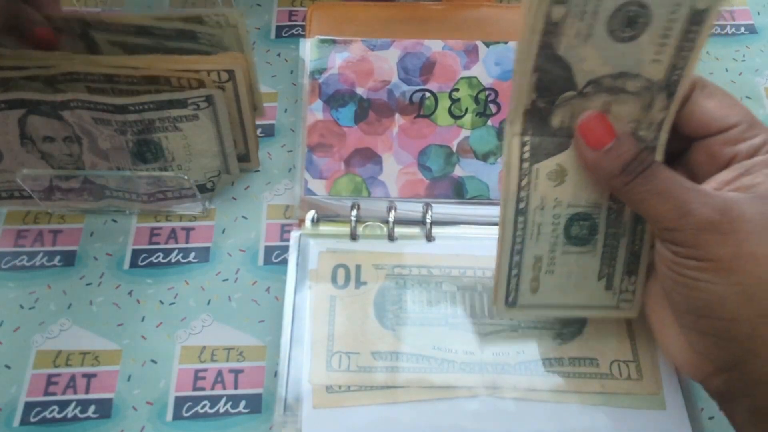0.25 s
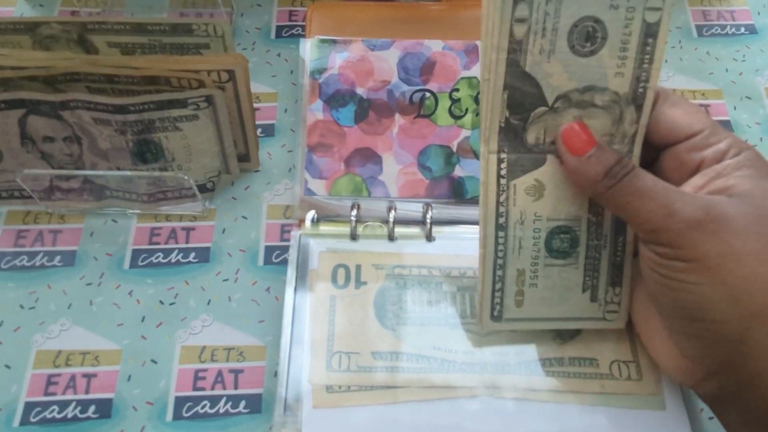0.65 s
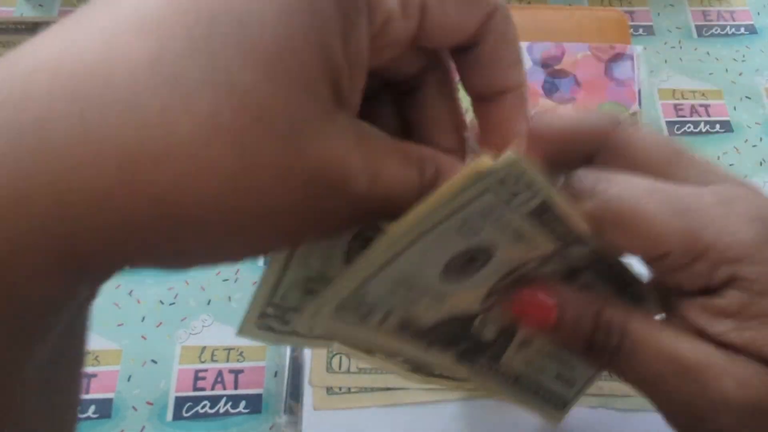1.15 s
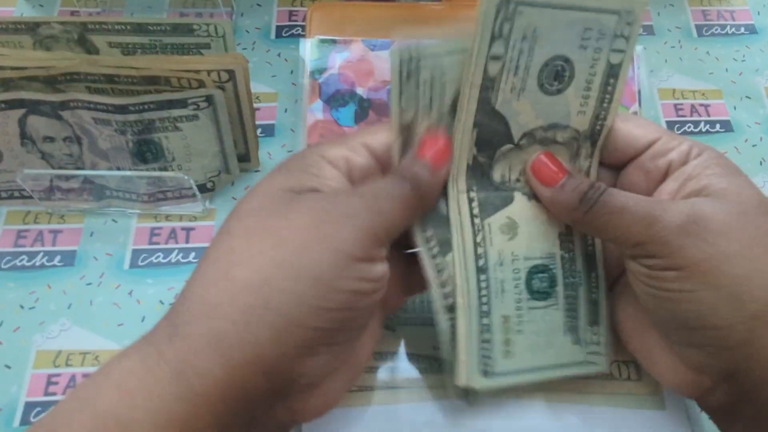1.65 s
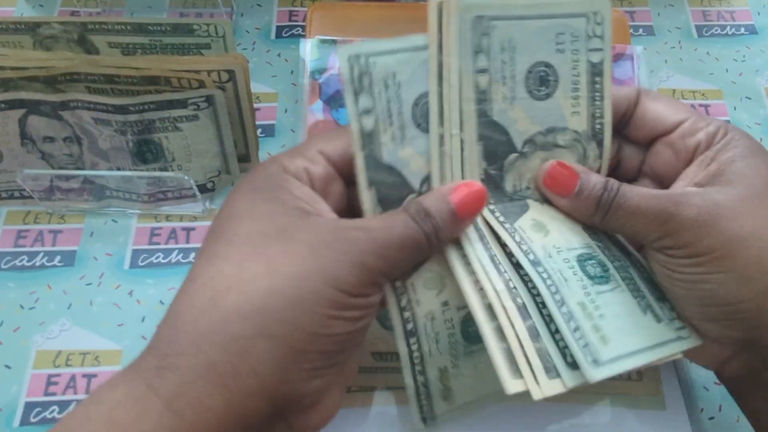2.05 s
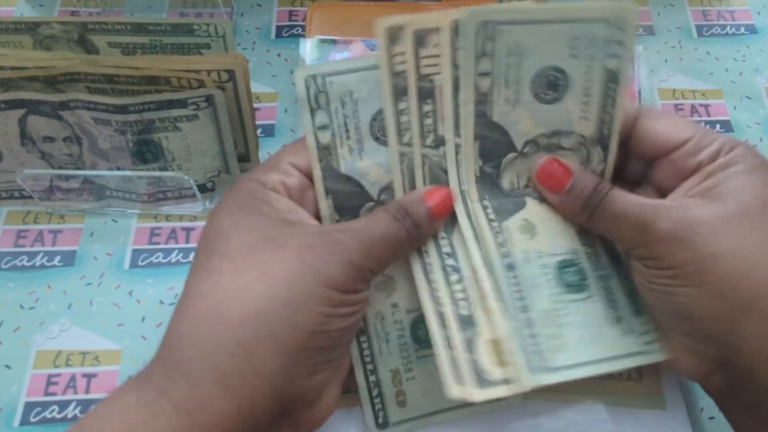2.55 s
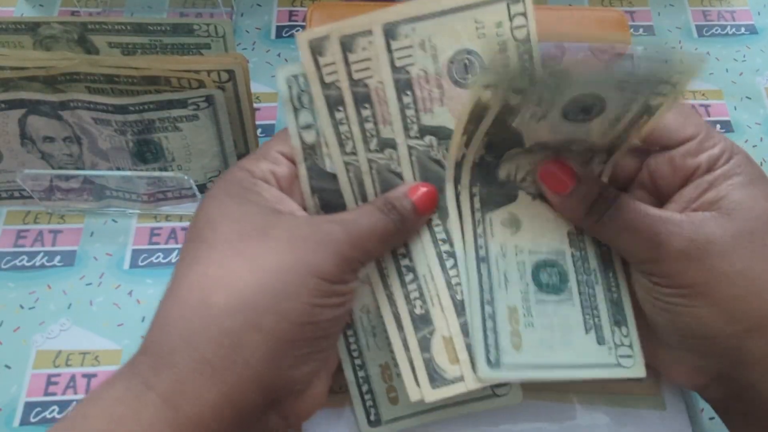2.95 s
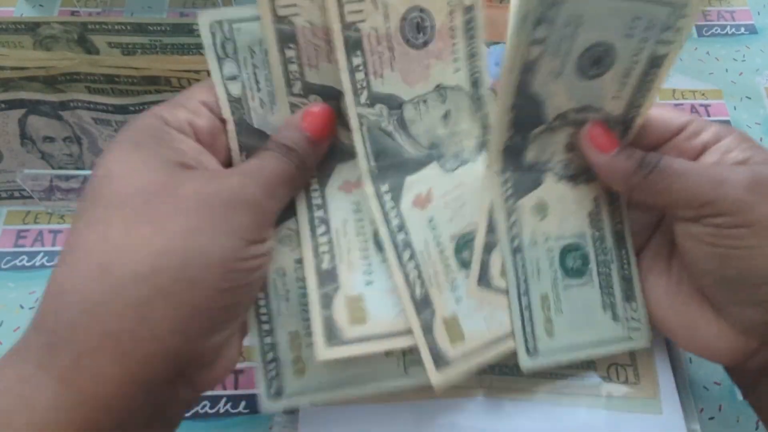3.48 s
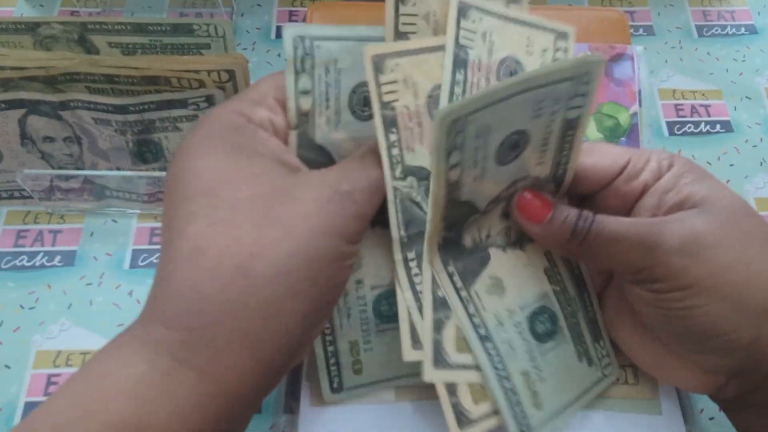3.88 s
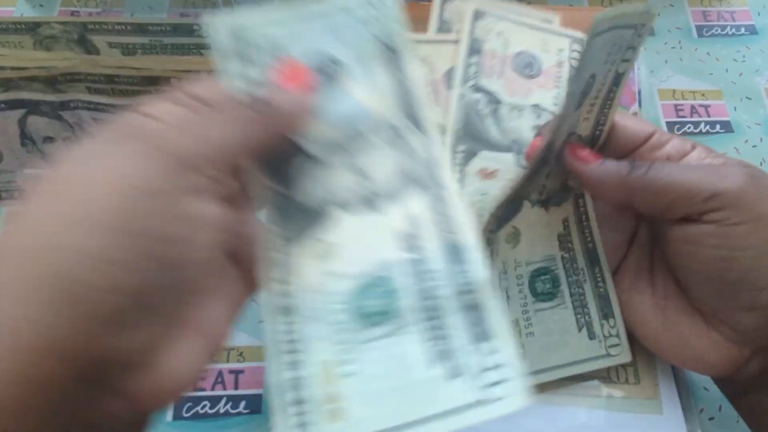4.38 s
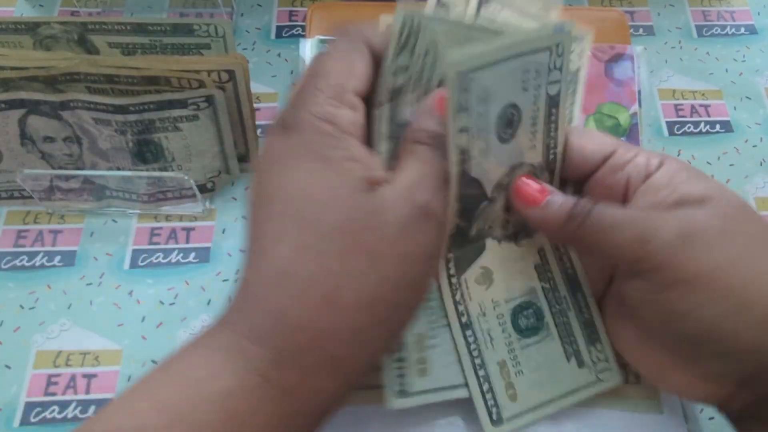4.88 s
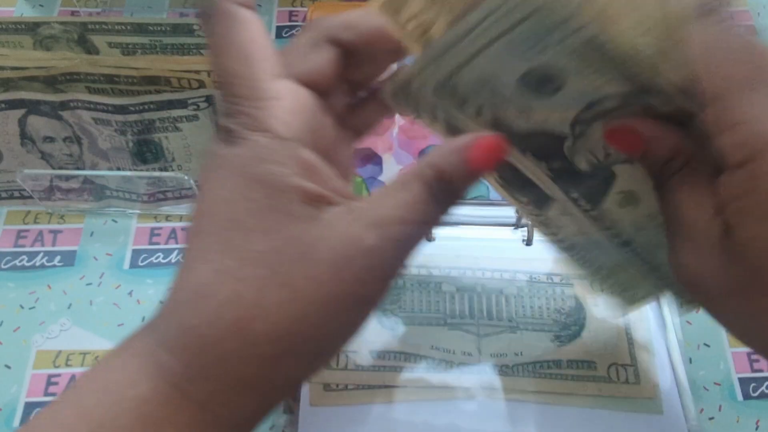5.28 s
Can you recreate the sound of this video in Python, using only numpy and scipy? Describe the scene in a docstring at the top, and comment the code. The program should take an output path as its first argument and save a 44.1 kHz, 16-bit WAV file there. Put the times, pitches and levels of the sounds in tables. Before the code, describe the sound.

A stack of paper money is fanned and leafed through by hand, faint papery slides and crackling pops in a quiet room.

```python
"""A faint grainy rustle opens: paper banknotes gathered, fanned and leafed through by hand, close above a desk.
Notes slide in short strokes (bursty filtered noise), crinkle (short rings), and scrape at their edges.
Bent notes buckle with snaps (pulse and noise through a resonance), and one is flicked off the stack.
Pushed air puffs low (low-band noise); the desk colours the snaps, a quiet room answers over its tone."""
import sys
import numpy as np
from scipy import signal
from scipy.fft import rfft, irfft, next_fast_len
from scipy.io import wavfile
from scipy.ndimage import uniform_filter1d, map_coordinates

SR = 44100
rng = np.random.default_rng(int(sys.argv[2]) if len(sys.argv) > 2 else 0)


def log_audio(samples):
    """Write samples as a 16-bit WAV file to the path given in sys.argv[1]."""
    # one column per channel
    frames = np.atleast_2d(samples).T
    # limit to full scale, then quantise
    limited = np.clip(frames, -1, 1)
    pcm = np.round(limited * 32767).astype(np.int16)
    wavfile.write(sys.argv[1], SR, pcm)


N = 243917

# All table levels are relative; the mix trims them further.
# room tone spectrum: freq_hz, level_db
ROOM_TONE_COLOUR = [(20, -46.5), (32, -22), (50, -3.5), (110, -1), (200, -10.5), (300, -8), (430, -5.5),
                    (640, -15), (950, -15.5), (1600, -36), (4000, -28), (15000, -43)]
# room decay: freq_hz, t60_s
ROOM_DECAY = [(150, 0.16), (1200, 0.26), (5000, 0.49), (14000, 0.42)]
# left-right likeness: freq_hz, correlation (0..1)
STEREO_LIKENESS = [(100, 0.86), (500, 0.81), (1200, 0.63), (2000, 0.24), (3200, 0.069), (6000, 0.094),
                   (15000, .03)]
# where the hands hold the notes: time_s, right_lag_ms, left_minus_right_db
HAND_POSITIONS = [(0,0.29,0), (.75,0.28,0.5), (1.3,0.14,0), (1.6,0.0076,-2), (2.5,0.056,-1), (3.2,.02,-1),
                  (3.7,0.096,-0.5), (4.2,0.13,0), (4.7,0.049,0), (5.1,0.025,-1.5), (5.5,-0.034,0.5)]
# fingertip drags, one fold sings: middle_s, half_length_s, centre_hz, width_hz, level_db
DRAGS = [(0.135, 0.047, 3600, 910, -67), (0.38, 0.033, 3080, 1600, -57.5), (0.457, .025, 3330, 1100, -62),
         (0.499, 0.021, 2270, 400, -60), (0.576, .05, 2940, 1300, -60), (0.776, 0.02, 2720, 800, -59),
         (0.955, 0.03, 2220, 800, -57.5), (2.079, 0.019, 2280, 500, -66.5), (2.232, 0.039, 1070, 300, -60),
         (4.369, 0.021, 3800, 1600, -56), (4.692, 0.0057, 3470, 1110, -42), (4.721, 0.02, 2580, 890, -40)]
# edge swipes across a note: start_s, length_s, level_db, body_re_hiss_db
SWIPES = [(0.224, 0.015, -55, -8.5), (0.606, .015, -53, -6), (0.721, 0.046, -52, -20),
          (0.981, 0.04, -50, -11), (1.118, 0.013, -53, -9), (1.214, 0.0037, -55, -5),
          (1.487, 0.037, -47.5, -3.5), (1.933, .025, -53, -1.5), (2.266, .01, -55, -11),
          (2.448, 0.026, -52, -8), (3.668, 0.012, -46.5, -8), (3.705, 0.0032, -39.5, 0),
          (3.726, 0.027, -61, -4), (4.689, 0.009, -41.5, -2.5), (4.707, 0.037, -37.5, -12)]
# swipe hiss spectrum: freq_hz, level_db
SWIPE_HISS_COLOUR = [(1200, -30.5), (2400, -2.5), (3500, -3.5), (6000, -1), (10000, -5), (15000, -5.5)]
# buckling notes: time_s, body_db, pitch_hz, sharpness_q, crack_db, air_push_db, left_minus_right_db
SNAPS = [(.067,-54.5,1570,0.37,-67,-77,-2), (0.1219,-54.5,2170,1.6,-64.5,-74,0.5),
         (.322,-54.5,1400,2.6,-74,-75,1), (.6533,-54,1300,1.6,-65,-71,-3),
         (0.6908,-45.5,1390,1.5,-72,-52.5,1), (.7443,-39,2190,0.87,-58,-44.5,2),
         (.8008,-52.5,814,1.3,-80,-59,1), (0.8845,-35,1710,1,-73,-52,-2.5),
         (0.9107,-41.5,1070,4.5,-66,-68,2.5), (0.9139,-37.5,1320,2.3,-60,-67,-3.5),
         (1.005,-40,1490,1.5,-46.5,-48,-2), (1.0189,-41.5,1350,5.7,-69,-46.5,-1),
         (1.113,-54.5,1660,1.3,-66,-75,-2), (1.2031,-56,480,2.1,-60,-59,-1),
         (1.25,-39.5,1630,.97,-48.5,-55,0), (1.2814,-44.5,535,1.4,-53,-54,0),
         (1.3245,-50,2010,1.6,-55,-54,2), (1.3564,-50,1960,1.4,-49.5,-52,-4),
         (1.3719,-45,1320,0.62,-48,-54,1), (1.4882,-60,1940,1.9,-46.5,-61,-2),
         (1.498,-45,2200,1.4,-43.5,-51,-3), (1.521,-54.5,1980,1.6,-43.5,-59,-1),
         (1.7389,-43,1380,1.04,-66,-64,-2), (1.7573,-52,1450,1.1,-69,-54,-1),
         (1.8419,-45,1340,0.71,-65,-51.5,-3), (1.941,-50.5,1280,1.8,-58,-63,-1),
         (2.2657,-58,1840,1.9,-50,-80,-3), (2.4697,-35,1230,1,-62,-49.5,-2),
         (2.5774,-50,1160,2.9,-53.5,-62,-2), (2.8206,-33,1630,2.6,-35,-80,-3.5),
         (2.9418,-47.5,1680,1.8,-53.5,-84,-2), (3.072,-62,446,1.2,-75,-60,-1),
         (3.1534,-48.5,970,1.5,-70,-51.5,-2), (3.217,-45.5,625,1,-53,-60,-1),
         (3.2617,-52,985,1.8,-68,-61,0), (3.481,-52,1400,3.1,-66,-82,-5),
         (3.6688,-47.5,880,1.2,-51,-51.5,1), (3.7049,-30,2260,0.98,-24,-46,2.5),
         (3.712,-30,1890,1.7,-39,-40,-2), (3.718,-35,1480,1.9,-48,-41,-1), (3.807,-55.5,600,1.8,-70,-65,-3),
         (3.998,-56.5,560,1.3,-70,-57,-1), (4.0256,-42,1310,3.4,-59,-61,-2),
         (4.0652,-49.5,756,4.5,-57,-70,-2), (4.2221,-46,2420,0.62,-65,-63,2),
         (4.2264,-41.5,1260,7.2,-71,-60,-5), (4.3213,-52.5,499,4.7,-57,-59,0),
         (4.471,-60.5,520,2.2,-70,-82,-1), (4.63,-64,520,1.5,-71.5,-75,1),
         (4.8311,-54,870,0.38,-51.5,-72,-1), (5.0246,-50,1310,0.47,-66,-56.5,-4),
         (5.0743,-40,1400,4.5,-66,-58,-2), (5.1325,-51,1660,1.1,-47,-55,-2),
         (5.1796,-47.5,1190,3.1,-54,-54,-1), (5.204,-50.5,865,2,-61,-55,-2),
         (5.2509,-38.5,1590,1.2,-48.5,-48,-1), (5.297,-54.5,1620,4.9,-71,-69,-2),
         (5.314,-51,1130,4,-76,-63,1), (5.4314,-52,620,1.4,-76,-54.5,.5), (5.517,-56,1400,2.4,-65,-65,-3)]
# paper close to the desk, spectrum: freq_hz, level_db
DESK_COLOUR = [(100, -20), (260, -11), (330, -1), (430, 10.5), (620, -4), (830, 0.5), (1180, 4.5),
               (1550, -3.5), (1950, 0.5), (2500, 0), (3400, -5.5), (5000, -11.5), (9000, -33), (16000, -31)]
# snap crack spectrum: freq_hz, level_db
CRACK_COLOUR = [(500, -24), (2200, -0.5), (3500, 0.5), (5500, 4), (8500, 4), (12000, -3), (15500, -3)]
# snap air push spectrum: freq_hz, level_db
PUSH_COLOUR = [(25, -34), (45, -7), (70, -3), (120, 2.5), (190, -3.5), (260, -1), (350, -11), (600, -28.5),
               (1500, -76)]
# note pushed over note: start_s, length_s, hiss_db, body_db, air_db, swell_over_stroke_db
STROKES = [(0.0, 0.0061, -64.5, -63.5, -63, 6), (0.076, 0.047, -71.5, -71, -80, -5),
           (0.22, 0.17, -59, -61.5, -86, 2), (0.461, 0.041, -76, -61.5, -65.5, -7),
           (0.517, 0.12, -59, -64.5, -78, -4), (0.616, 0.12, -63, -58, -64, 16),
           (0.847, 0.072, -58, -59, -74, 0.5), (0.996, 0.025, -51.5, -50, -54, -1.5),
           (1.125, 0.039, -62.5, -58, -62.5, -6), (1.207, 0.15, -52.5, -57, -63, 12),
           (1.45, 0.108, -55.5, -61, -64, 0.5), (1.603, 0.11, -56.5, -64.5, -64, 2),
           (1.725, 0.097, -52, -54.5, -66, 5.5), (1.945, 0.11, -62.5, -68.5, -70, -8.5),
           (2.12, 0.11, -59.5, -62.5, -81, -8.5), (2.25, 0.078, -55.5, -57.5, -67, 1.5),
           (2.395, 0.078, -52.5, -53.5, -74, 4), (2.54, 0.18, -59.5, -59.5, -63.5, -5),
           (2.761, 0.12, -57, -57.5, -69, 5.5), (2.931, 0.056, -63, -67, -67, 7),
           (3.091, 0.16, -53.5, -53.5, -68.0, 2), (3.309, 0.26, -55.5, -58.5, -70, 5),
           (3.616, 0.13, -50, -52.5, -59.5, 8.5), (3.872, 0.117, -53.5, -52.5, -62, -2.5),
           (4.023, 0.14, -52.5, -54, -64, 0), (4.281, 0.1, -59.5, -63.5, -74, 7.5),
           (4.466, 0.012, -63, -59, -70, 4.5), (4.727, 0.096, -54.5, -57.0, -60, -8),
           (4.877, 0.152, -54.0, -57, -63.5, 4), (5.04, 0.094, -48.5, -50, -59, 9.0),
           (5.179, 0.056, -56.5, -57.5, -58, 6), (5.316, 0.12, -59, -55.5, -64, 3)]
# sliding hiss spectrum: freq_hz, level_db
HISS_COLOUR = [(1200, -30.5), (2200, -3.5), (2800, -2.5), (4000, -5), (5000, -2), (7500, -4.5),
               (8600, -3.5), (9800, -9.5), (11500, -3.5), (14000, -6.5), (15500, -11.5)]
# bending paper body spectrum: freq_hz, level_db
BODY_COLOUR = [(160, -46), (280, -12), (308, -18), (453, -1), (631, -13.5), (748, -4.5), (878, -11),
               (967, 0), (1160, -0.5), (1450, -3.5), (1820, -1), (2110, -5.5), (2500, -7), (2910, -12.5),
               (3600, -16.5), (4680, -35), (7920, -120)]
# stroke air spectrum: freq_hz, level_db
AIR_COLOUR = [(20, -52), (30, -34), (48, 3.5), (80, -1), (120, 3), (200, -8.5), (300, -9), (500, -23),
              (1500, -72)]

LOW_CUT_HZ, TOP_HZ = 38, 15500
STROKE_RISE_S, STROKE_FALL_S = 0.11, 0.33  # 60 dB up, 60 dB down
HELD_HISS_DB, HELD_BODY_DB, HELD_AIR_DB = -89.5, -69.5, -73  # stack merely held in restless fingers
# shiver t60 grows with the push: RING_S at the weakest, twice that at RING_DB
RING_S, RING_DB = 0.013, -50.5


def amp(db):
    """Decibels to gain."""
    return np.exp(np.asarray(db) * (np.log(10) / 20))


def unit(x):
    """Scale to rms 1."""
    return x / np.sqrt(np.mean(x ** 2) + 1e-20)


def along(points, hz):
    """Interpolate (Hz, value) points on a log-frequency axis."""
    point_hz, value = np.transpose(points)
    return np.interp(np.log(hz + 1), np.log(point_hz + 1), value)


def wobble(knots_per_s):
    """Smooth random curve through Gaussian knots."""
    knots = rng.standard_normal(int(N * knots_per_s / SR) + 4)
    return map_coordinates(knots, [np.arange(N) * knots_per_s / SR])


def curves(rows):
    """One value per sample for each column after the time."""
    time_s, *columns = np.transpose(rows)
    return [np.interp(np.arange(N) / SR, time_s, column) for column in columns]


def filtered(x, response):
    """Apply a complex response of frequency, zero-padded."""
    n = x.shape[-1]
    m = 2 * next_fast_len(n // 2 + SR // 20)
    return irfft(rfft(x, m) * response(np.fft.rfftfreq(m, 1 / SR)), m)[..., :n]


def causal(db):
    """Minimum-phase response with these levels, by folding the cepstrum."""
    cepstrum = irfft(np.log(amp(db)))
    half = len(cepstrum) // 2
    cepstrum[1:half] *= 2
    cepstrum[half + 1:] = 0
    return np.exp(rfft(cepstrum))


def heard(pair, colour):
    """Colour two unrelated signals into left and right, alike in the bass."""
    def response(hz):
        turn = np.arccos(np.clip(along(STEREO_LIKENESS, hz), -1, 1)) / 2
        return causal(along(colour, hz)) * [np.cos(turn), np.sin(turn)]

    mid, side = filtered(pair, response)
    return np.array([mid + side, mid - side])


def panned(pair, left_minus_right_db):
    """Split a level difference evenly between left and right."""
    return pair * amp(np.array([[.5], [-.5]]) * left_minus_right_db)


def lagged(pair, lag_ms):
    """Delay right against left by a moving lag, half on each side."""
    n, half = np.arange(N), lag_ms * SR / 10 ** 3 / 2
    left = map_coordinates(pair[0], [n + half], order=5)
    right = map_coordinates(pair[1], [n - half], order=5)
    return np.array([left, right])


def add(track, start_s, sound):
    """Mix a sound in at a time, cut at the end of the track."""
    part = track[:, max(round(start_s * SR), 0):][:, :sound.shape[1]]
    part += sound[:, :part.shape[1]]


def contact(start_s, length_s, rise_s, fall_s):
    """Gain of a touch: 60 dB swell in rise_s, hold, 60 dB decay in fall_s; floor -120 dB."""
    t = np.arange(N) / SR - start_s
    return amp(-60 * np.clip(np.maximum(-t / rise_s, (t - length_s) / fall_s), 0, 2))


def room_tone():
    """Steady coloured noise, rms 1."""
    return unit(heard(rng.standard_normal((2, N)), ROOM_TONE_COLOUR))


def room(x):
    """Short diffuse answer: left input convolved with noise dying at its own rate per frequency."""
    hz, t, z = signal.stft(rng.standard_normal((2, SR // 2)), SR, nperseg=256)
    decay = amp(-60 * t / along(ROOM_DECAY, hz)[:, None])
    tail = signal.istft(z * decay, SR, nperseg=256)[1]
    tail = heard(tail, [(200, 7.0), (1200, 0.0), (4000, -2.5), (14000, -2.5)])  # (Hz, dB)
    tail = np.pad(tail / np.linalg.norm(tail[0]), ((0, 0), (SR // 200, 0)))  # 5 ms pre-delay
    return signal.fftconvolve(x[:1], tail, axes=1)[:, :N]


def nearby(pair, delay_ms=2.1, drift=0.1382, share=0.19, count=3):
    """Hands and arms throw back weak copies whose delays drift as they move."""
    n = np.arange(N)
    out = pair.copy()
    for k in range(count):
        for side in range(2):
            stretch = np.exp(drift * (rng.standard_normal() + wobble(0.6) / 2))
            delay = (k + 1) * delay_ms * SR / 10 ** 3 * stretch
            out[side] += share / np.sqrt(k + 1) * map_coordinates(pair[side], [n - delay])
    return out


def friction(colour, grain_db, grains_per_s):
    """Fibres catch and let go: noise in tiny bursts of random size, rms 1."""
    grain = amp(grain_db * wobble(grains_per_s))
    return unit(heard(rng.standard_normal((2, N)) * grain, colour))


def shifting(pair, depth_db):
    """Gaps between bending notes change: patches of spectrum come and go. Rms 1."""
    z = signal.stft(pair, nperseg=512)[2]
    field = uniform_filter1d(rng.standard_normal(z.shape[1:]), size=7, axis=0)  # over frequency
    field = uniform_filter1d(field, size=15, axis=1)  # over time
    return unit(signal.istft(z * amp(depth_db * unit(field)), nperseg=512)[1][:, :N])


def drags():
    """Fingertip friction through one narrow fold resonance, swelling and fading."""
    t = np.arange(N) / SR
    track = np.zeros((2, N))
    for middle_s, half_s, centre_hz, width_hz, level_db in DRAGS:
        def fold(hz):
            band = 1j * hz * width_hz
            return (band / (centre_hz ** 2 - hz ** 2 + band)) ** 2

        span = np.abs(t - middle_s) < 3 * half_s
        song = unit(filtered(rng.standard_normal((2, SR // 2)), fold))[:, :span.sum()]
        track[:, span] += amp(level_db) * song * np.exp(-((t[span] - middle_s) / half_s) ** 2)
    return track


def swipes(rise_s=0.0092, t60_s=0.028):
    """An edge catches and scrapes quickly over a note, dying away as it slips off."""
    hiss, body = np.zeros(N), np.zeros(N)
    for start_s, length_s, level_db, body_re_hiss_db in SWIPES:
        scrape = amp(level_db) * contact(start_s, length_s, rise_s, t60_s)
        hiss += scrape
        body += amp(body_re_hiss_db) * scrape
    hiss = hiss * friction(SWIPE_HISS_COLOUR, grain_db=2, grains_per_s=900)
    return hiss + body * friction(BODY_COLOUR, grain_db=5.5, grains_per_s=490)


def snap(body_db, pitch_hz, sharpness_q, crack_db, push_db, pan_db, shiver=0.11, push_t60_s=0.087, lead_s=0.014):
    """A note creaks, then pops to a new shape: pulse, dying shiver, crack and push of air."""
    t = np.arange(-SR // 100, SR // 8) / SR  # pop at t = 0
    t60_s = RING_S * (1 + amp(push_db - RING_DB))  # a larger patch pushes more air, shivers longer

    def noise():
        return rng.standard_normal((2, len(t)))

    def dying(life_s):
        return noise() * (t >= 0) * amp(-60 * np.abs(t) / life_s)

    def creak():
        return noise() * (t < 0) * amp(-60 * np.abs(t) / lead_s)

    def sized(x):
        """Energy equal to rms 1 over 10 ms."""
        return x / np.sqrt(np.sum(x ** 2) / (2 * SR / 100))

    def patch(hz):
        """Resonance set by the size of the buckling patch."""
        band = 1j * hz * pitch_hz
        return band / (pitch_hz ** 2 - hz ** 2 + band / sharpness_q)

    pulse = (t == 0) * np.array([[1], [.2]])  # shared by left and right, and a little unshared
    body = 0.043 * creak() + pulse + shiver * dying(t60_s) + 0.016 * dying(t60_s * 3)
    body = filtered(heard(body, DESK_COLOUR), patch)
    crack = heard(0.26 * creak() + dying(t60_s * 0.74) + 0.16 * dying(t60_s * 4), CRACK_COLOUR)
    push = heard(pulse + 0.072 * dying(push_t60_s), PUSH_COLOUR)
    paper = amp(body_db) * sized(body) + amp(crack_db) * sized(crack)
    return panned(paper, pan_db) + amp(push_db) * sized(push)


def snaps():
    """Every buckling note at its moment."""
    track = np.zeros((2, N))
    for time_s, *buckle in SNAPS:
        add(track, time_s - 0.01, snap(*buckle))  # creak starts 10 ms early
    return track


def crinkles(rate_per_s, spread_db, pitch_hz, cycles, scatter=0.432):
    """Creases give way in clumps, each ringing a few cycles at its own pitch and size. Rms 1."""
    chance = rate_per_s / SR * amp(6 * wobble(14))  # wobble makes the clumps
    starts = np.flatnonzero(rng.random(N) < chance)
    size, pitch, left, right = rng.standard_normal((N // 20, 4))[:len(starts)].T[:, :, None]
    age = np.arange(SR // 150)
    turns = np.minimum(pitch_hz * np.exp(scatter * pitch), TOP_HZ) * age / SR
    envelope = turns * np.exp(-turns / cycles)
    ring = amp(spread_db * np.clip(size, -2, 2)) * np.sin(2 * np.pi * turns) * envelope
    where = (starts[:, None] + age).ravel()
    sides = [np.bincount(where, (ring * amp(2 * side)).ravel(), N)[:N] for side in (left, right)]
    return unit(np.array(sides))


def stroke_gains():
    """Gains of sliding, bending and pushed air: stroke powers added to the held stack."""
    t = np.arange(N) / SR
    power = amp([[HELD_HISS_DB], [HELD_BODY_DB], [HELD_AIR_DB]]) ** 2 * np.ones(N)
    for start_s, length_s, hiss_db, body_db, air_db, swell_db in STROKES:
        swell = amp(swell_db * (np.clip((t - start_s) / length_s, 0, 1) - .5))
        speed = contact(start_s, length_s, STROKE_RISE_S, STROKE_FALL_S) * swell
        first = max(round((start_s - STROKE_RISE_S) * SR), 0)
        near = slice(first, round((start_s + length_s + STROKE_FALL_S) * SR))
        power[:, near] += (amp([[hiss_db], [body_db], [air_db]]) * speed[near]) ** 2
    return np.sqrt(power)


def handling():
    """Notes slide over each other in uneven strokes, crinkle as they bend and push air."""
    sliding, bending, pushing = stroke_gains()
    pressure = wobble(60)  # fingers press unevenly
    hiss = shifting(friction(HISS_COLOUR, grain_db=2.0, grains_per_s=2000), depth_db=1.5)
    hiss = hiss + amp(-14.5) * crinkles(rate_per_s=160, spread_db=5.5, pitch_hz=3600, cycles=0.54)
    body = shifting(friction(BODY_COLOUR, grain_db=2, grains_per_s=400), depth_db=3.5)
    body = body + amp(-9.5) * crinkles(rate_per_s=110, spread_db=5.5, pitch_hz=1400, cycles=0.84)
    air = friction(AIR_COLOUR, grain_db=5, grains_per_s=37)
    slide = sliding * amp(0.38 + 1.4 * pressure) * hiss
    bend = bending * amp(-0.72 + 0.85 * pressure) * body
    return slide + bend + pushing * amp(-2.0) * air


def scene():
    """Room tone, room answer, and the paper heard from where the hands hold it."""
    lag_ms, pan_db = curves(HAND_POSITIONS)
    rubbing = panned(drags() + swipes() + handling(), pan_db)
    paper = amp(-0.68) * nearby(lagged(rubbing + snaps(), lag_ms))
    return amp(-70.5) * room_tone() + amp(-18.0) * room(paper) + paper


def record(dry):
    """Band limits, zero phase: gentle low cut, very steep top cut."""
    def band(hz):
        low_cut = hz ** 4 / np.sqrt(hz ** 8 + LOW_CUT_HZ ** 8)
        return low_cut / np.sqrt(1 + (hz / TOP_HZ) ** 160)

    return filtered(dry, band)


dry = scene()
out = record(dry)
log_audio(out)
```